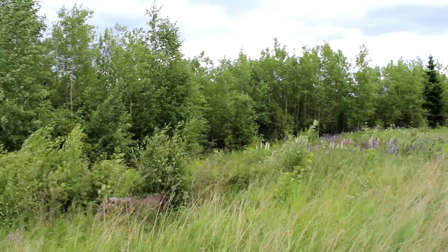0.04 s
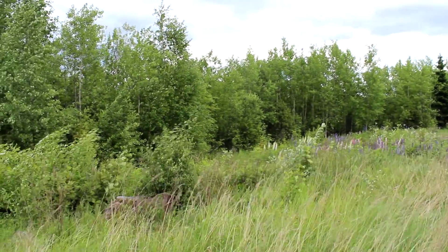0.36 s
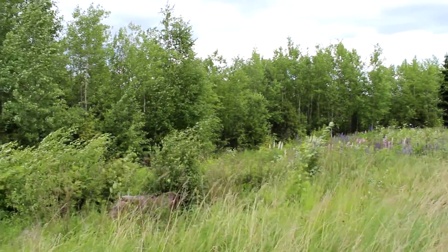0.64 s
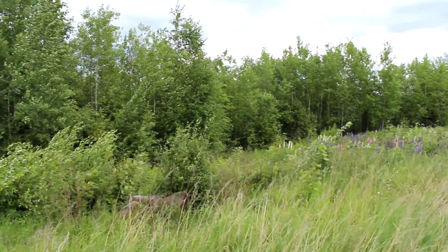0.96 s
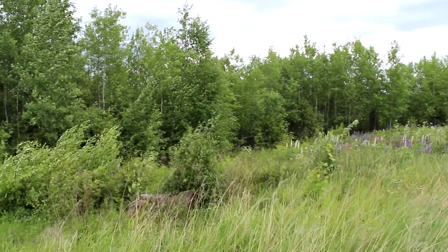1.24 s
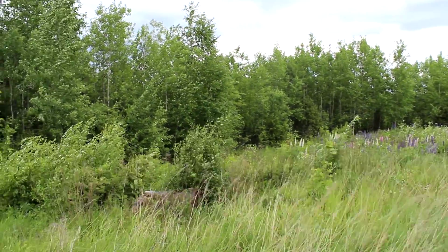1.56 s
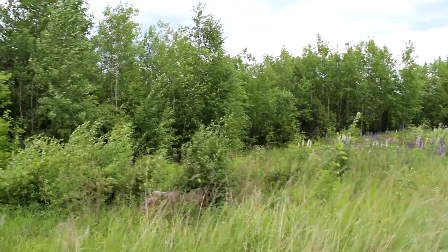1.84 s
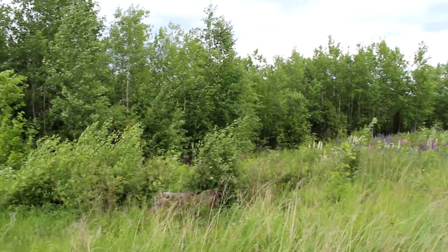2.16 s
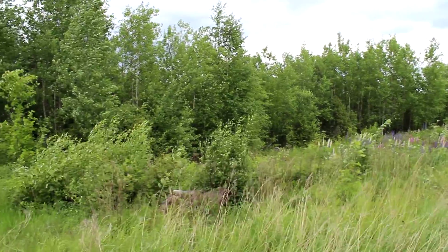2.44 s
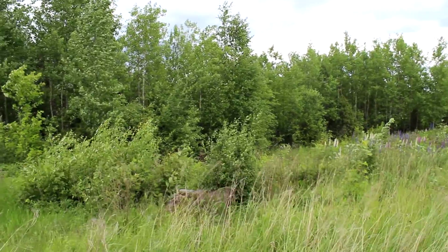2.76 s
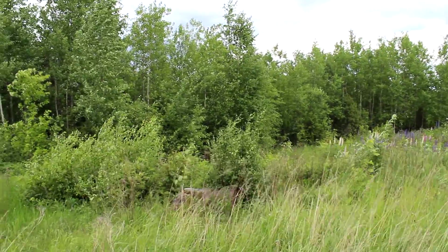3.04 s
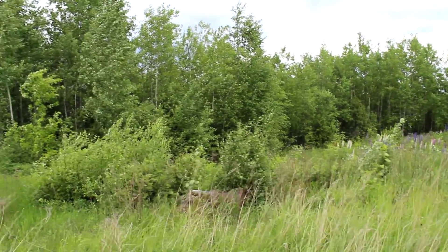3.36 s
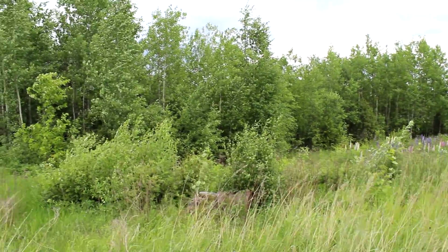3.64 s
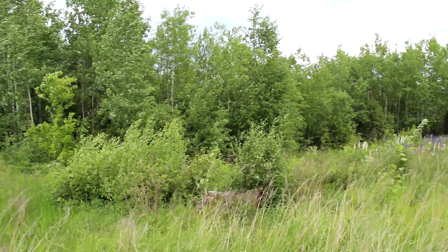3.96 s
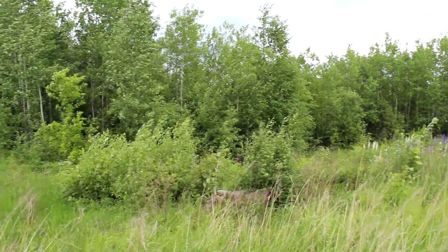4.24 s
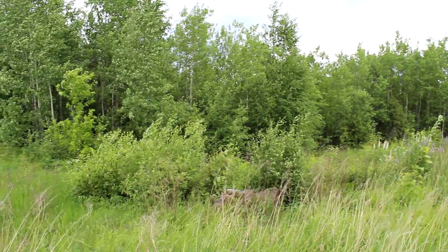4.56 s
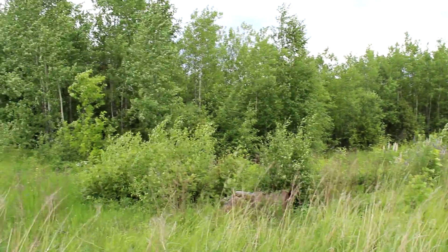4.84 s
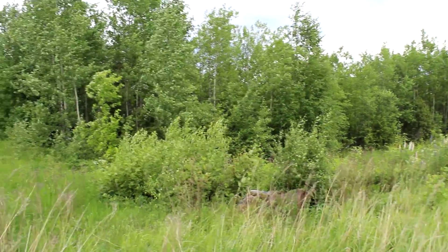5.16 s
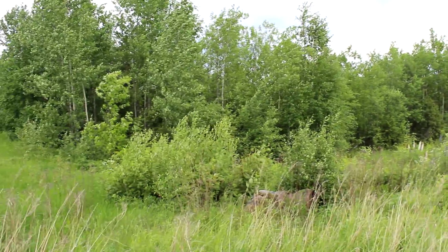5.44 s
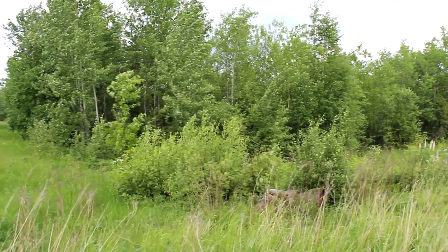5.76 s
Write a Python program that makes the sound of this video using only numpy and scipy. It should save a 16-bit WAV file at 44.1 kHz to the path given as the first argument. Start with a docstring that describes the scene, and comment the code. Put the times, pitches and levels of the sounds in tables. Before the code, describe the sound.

Wind flutters, sputters and knocks on a single small microphone outdoors, in tall grass beside a wood. Under the uneven rumble runs a broad rush of treetops and a fine hiss of nearby leaves. The foliage comes forward during a short lull, sinks back as more buffets arrive, then builds to its loudest and slightly higher in pitch at the close.

```python
"""An open meadow at the edge of a wood, in gusty wind, heard through one small microphone.
The tree crowns roar, near leaves and grass hiss, and a few dry stalks tick.
Eddies sweep over the microphone port as a fluttering rumble with hard buffets.
Each strong buffet makes a limiter duck, so the trees drop away and swell back in the lulls."""
import sys
import numpy as np
from scipy import signal
from scipy.fft import rfft, irfft, next_fast_len
from scipy.io import wavfile
from scipy.ndimage import uniform_filter1d, map_coordinates

SR = 44100
rng = np.random.default_rng(int(sys.argv[2]) if len(sys.argv) > 2 else 0)


def dump_mix(stems):
    """Bounce the given channels to the path in sys.argv[1] as a 16-bit WAV at rate SR."""
    frames = np.atleast_2d(stems).T  # one column per channel
    limited = np.clip(frames, -1, 1)  # hard clip at full scale
    pcm = np.round(limited * 32767).astype(np.int16)
    wavfile.write(sys.argv[1], SR, pcm)


N = 260631
TIME = np.arange(N) / SR

# Wind in the trees. Each row: time in seconds, crown level in dB, leaf level in dB, roar pitch factor.
TREE_WIND = [(0.0, -24.5, -34.5, 0.9), (0.8, -23.5, -35.5, 1.02), (1.6, -20.5, -32, 1.03),
             (2.05, -21, -32, 0.99), (2.3, -18, -30, 1.007), (2.75, -19, -34, 1.003), (3.4, -22, -33, 1.04),
             (3.95, -23.5, -40.5, 0.99), (4.4, -25.5, -38, 1.28), (4.85, -21.5, -33, 1.145),
             (5.3, -17, -28.5, 1.095), (5.91, -13.5, -31.5, 1.315)]
# Roar of the crowns at pitch factor 1. Each row: frequency in Hz, relative density in dB.
ROAR_SPECTRUM = [(100, -17.5), (300, -13), (500, -6.5), (700, -4.5), (950, 1), (1200, 0.5), (1550, -4),
                 (2000, -13), (2600, -23.5), (3400, -29), (6000, -42), (16000, -70)]
# Hiss of the leaves. Each row: frequency in Hz, relative density in dB.
HISS_SPECTRUM = [(500, -3), (2000, 7.5), (3200, 0.5), (4200, -1), (5200, -2), (6500, -4.5), (8000, -9),
                 (10000, -14.5), (12500, -18.5), (15700, -20)]
# Crispness of the leaves. Each row: time in seconds, added treble slope in dB per octave.
LEAF_CRISPNESS = [(0, 2.5), (.8, 3), (1.7, -1.5), (2.4, -3), (3.0, -2), (5.91, -0.5)]
# Ticks of dry stalks. Each row: middle in seconds, length in seconds, level in dB, pitch in Hz.
STALK_TICKS = [(1.27, .008, -50, 12500), (1.705, .05, -56, 14200), (2.246, .005, -48, 12800)]
# Slow pressure swings on the microphone. Each row: time in seconds, level in dB.
RUMBLE_LEVEL = [(0, -14), (.95, -24), (1.3, -34), (1.9, -28), (2.25, -34), (2.5, -24), (3.2, -26),
                (4.05, -26), (4.35, -35), (5.15, -26), (5.91, -30)]
# Spectrum of those swings. Each row: frequency in Hz, relative density in dB.
RUMBLE_SPECTRUM = [(5, -5), (20, -3), (45, 4), (70, 11.5), (120, -22), (400, -43), (2000, -100)]
# Sputter of small vortices. Each row: time in seconds, level in dB relative to the airflow.
SPUTTER_LEVEL = [(0, -12), (.8, -14), (1.3, -6), (2.2, -8.5), (3.0, -10), (3.3, -13.5), (3.75, -7.5),
                 (4.15, -6.5), (4.3, -20.5), (5.4, -17.5), (5.91, -30)]
# Tight vortices that crack in the port. Each row: time in seconds, peak in dB, pitch in Hz.
VORTEX_SNAPS = [(.321, 3.5, 620), (.4947, 8, 997.7), (.4965, -8, 2600), (.681, 7.5, 694), (2.997, 4, 939.9),
                (2.998, -8, 2104), (3.673, -3, 1349), (3.731, -2.5, 1300), (3.987, -3, 1191),
                (4.079, -8, 1602)]
# Steady airflow over the port. Each row: time in seconds, relative level in dB, eddy rate in Hz.
STEADY_FLOW = [(0.0, -21.0, 300.7), (0.37, -8.5, 251.7), (0.58, -31.5, 271.4), (0.95, -15, 241.9),
               (1.29, -11.5, 320.8), (1.76, -24.0, 258.6), (2.0, -12.0, 263.9), (2.12, -22, 269.8),
               (2.6, -17, 279.3), (2.91, -6.5, 289.1), (3.43, -9.5, 239), (4.13, -5.5, 291.6),
               (4.26, -20.5, 278.3), (4.74, -10.0, 302.2), (5.03, -13.5, 190.7), (5.33, -23.5, 270.3),
               (5.66, -17.5, 241.4), (5.91, -16.5, 192.3)]
# Single buffets. Each row: middle in seconds, length in seconds, level in dB, eddy rate in Hz.
PORT_BUFFETS = [(0.016, 0.035, -4.5, 319.8), (0.098, 0.036, -7, 399.8), (0.131, 0.0076, 4, 270),
                (0.349, 0.012, 0, 217.6), (0.374, 0.0081, -4, 299), (0.494, 0.02, 2.0, 332),
                (0.547, 0.011, -5.5, 319), (0.681, 0.008, 1.5, 297.3), (0.736, 0.099, -5.5, 249.2),
                (0.921, 0.012, 0, 204.9), (0.95, 0.016, 3, 248.5), (1.043, 0.012, 1.0, 240.4),
                (1.1, 0.082, -2.0, 311.5), (1.136, 0.00982, -1, 397.7), (1.358, 0.0083, -2.5, 317),
                (1.443, 0.0095, -6.0, 393.6), (1.62, 0.057, -14.5, 298.2), (1.905, 0.038, -9.5, 225),
                (1.988, 0.04, -8.5, 218), (2.517, 0.047, 1, 299.3), (2.681, 0.023, -1.5, 250.1),
                (2.873, 0.019, 1, 339.8), (3.003, 0.024, -2, 288.7), (3.04, 0.018, -2.5, 262),
                (3.089, 0.015, -6.0, 233.4), (3.146, 0.012, 1.5, 237), (3.282, 0.041, -5.0, 199.7),
                (3.378, 0.033, -3.0, 291.4), (3.483, 0.015, -4, 199.2), (3.564, 0.0163, -5.5, 225.1),
                (3.611, 0.016, -4.5, 259.9), (3.668, 0.012, -7, 351.2), (3.743, 0.022, -2.5, 263),
                (3.934, 0.026, -4, 384.2), (4.08, 0.008, 1, 411), (4.181, 0.037, -8.0, 272.8),
                (4.436, 0.014, -3.5, 269.2), (4.619, 0.013, -9, 380.1), (4.697, 0.011, -6, 309),
                (4.786, 0.035, -12.5, 301.5), (4.86, 0.0085, 0, 238.5), (5.154, 0.16, -11.5, 185),
                (5.208, 0.037, -3.5, 190), (5.246, 0.022, -4, 330.4), (5.468, 0.049, 2.0, 278.5),
                (5.548, 0.063, -3.5, 319.6), (5.745, 0.023, -10, 138.8)]
# Pressure of eddies passing at EDDY_HZ. Each row: frequency in Hz, relative density in dB.
EDDY_SPECTRUM = [(15, -27), (40, -63), (75, -3.5), (130, -0.5), (210, 1), (320, -2.5), (460, -9.5),
                 (650, -19), (1000, -30), (1600, -34.5), (3000, -65.5), (6000, -84)]
EDDY_HZ = 280.6


def gain_of(db):
    """Amplitude grows tenfold with every 20 dB."""
    return 10 ** (np.asarray(db) / 20)


def unit_rms(x):
    """Normalisation to a mean power of 1."""
    return x / np.sqrt(np.mean(x ** 2) + 1e-20)


def spectrum_db(spectrum, hz):
    """Interpolation of a spectrum on a logarithmic frequency axis."""
    knots_hz, db = np.transpose(spectrum)
    return np.interp(np.log(hz + 1), np.log(knots_hz + 1), db)


def follow(rows, t):
    """Linear interpolation of every column of a curve at the times t."""
    times, *columns = np.transpose(rows)
    return [np.interp(t, times, column) for column in columns]


def noise(spectrum, size):
    """Spectral shaping: white noise takes on the given spectrum."""
    padded = next_fast_len(size, real=True)
    gain = gain_of(spectrum_db(spectrum, np.fft.rfftfreq(padded, 1 / SR)))
    return unit_rms(irfft(rfft(rng.standard_normal(padded)) * gain, padded)[:size])


def wander(rate_hz):
    """Band-limited noise: a random fluctuation from about 2 Hz up to rate_hz."""
    padded = next_fast_len(N, real=True)
    hz = np.fft.rfftfreq(padded, 1 / SR)
    gain = hz / (hz + 2) / (1 + (hz / rate_hz) ** 4)
    return unit_rms(irfft(rfft(rng.standard_normal(padded)) * gain, padded)[:N])


def grid(size=512):
    """The time-frequency plane: frame times as a column, frequencies as a row."""
    return np.arange(0, N + size, size // 4)[:, None] / SR, np.fft.rfftfreq(size, 1 / SR)


def rustle(field_db, patchy_db, size=512):
    """Short-time shaping: noise of even power, coloured in patches as single boughs catch the wind."""
    real, imag, patches = rng.standard_normal((3, *field_db.shape))
    patches = unit_rms(uniform_filter1d(uniform_filter1d(patches, 18, axis=0), 7, axis=1))
    gain = gain_of(field_db + patchy_db * patches)
    spectra = (real + 1j * imag) * gain / np.linalg.norm(gain, axis=1, keepdims=True)
    return unit_rms(signal.istft(spectra.T, nperseg=size, noverlap=size - size // 4)[1][:N])


def crowns():
    """Aeolian sound: the broad, distant roar rises in pitch with the wind speed."""
    t, hz = grid()
    level_db, speed = follow(TREE_WIND, TIME)[0], follow(TREE_WIND, t)[2]
    sway_db = 0.45 * wander(rate_hz=25)
    return gain_of(level_db + sway_db) * rustle(spectrum_db(ROAR_SPECTRUM, hz / speed), patchy_db=1.85)


def leaves():
    """Incoherent addition: countless leaf contacts merge into a hiss with a fine grain."""
    t, hz = grid()
    level_db = follow(TREE_WIND, TIME)[1]
    treble_db = follow(LEAF_CRISPNESS, t)[0] * np.log2(1 + hz / 5000)
    hiss = rustle(spectrum_db(HISS_SPECTRUM, hz) + treble_db, patchy_db=0.25)
    flicker_db = 0.75 * wander(rate_hz=20)
    grain = gain_of(0.39 * wander(rate_hz=1200))
    return gain_of(level_db + flicker_db) * unit_rms(hiss * grain)


def bump(middle, length):
    """A super-Gaussian envelope: height 1, steep flanks, an area of about its length."""
    out, near = np.zeros(N), abs(TIME - middle) < 2 * length
    out[near] = np.exp(-abs(np.sqrt(np.pi) * (TIME[near] - middle) / length) ** 3)
    return out


def stalks():
    """Friction: dry stalks brush each other with a thin, high tick of narrow-band noise."""
    out = np.zeros(N)
    for middle, length, db, hz in STALK_TICKS:
        scrape = wander(rate_hz=1100) * np.cos(2 * np.pi * hz * TIME)
        out += gain_of(db) * bump(middle, length) * unit_rms(scrape)
    return out


def rumble():
    """Turbulent pressure: the largest eddies press slowly on the microphone."""
    level_db, = follow(RUMBLE_LEVEL, TIME)
    return gain_of(level_db) * noise(RUMBLE_SPECTRUM, size=N)


def vortex(t, hz):
    """Convection: a vortex core crosses the port as a pressure swing of one or two cycles."""
    phase = 2 * np.pi * hz * t
    return np.cos(phase) / np.cosh(np.clip(phase / 1.3, -30, 30))


def sputter(per_s, low_hz, high_hz, sizes=16):
    """A Poisson process: small vortices break off at random; the smaller, the higher and weaker."""
    t, out = np.arange(-400, 400) / SR, np.zeros(N)
    for hz in np.geomspace(low_hz, high_hz, sizes):
        kicks = rng.uniform(-1.23, 1, N) * (rng.random(N) < per_s / sizes / SR)
        out += low_hz / hz * signal.oaconvolve(kicks, vortex(t, hz), "same")
    return unit_rms(out)


def vortex_pops(core_boost_db=2.5, core_pitch_ratio=1.09):
    """Pressure transients: a vortex knocks at the heart of each buffet, and tighter ones crack."""
    cores = [(middle, db + core_boost_db, hz * core_pitch_ratio) for middle, _, db, hz in PORT_BUFFETS]
    out = np.zeros(N)
    for middle, db, hz in cores + list(VORTEX_SNAPS):
        near = abs(TIME - middle) < 2 / hz
        out[near] += gain_of(db) * vortex(TIME[near] - middle, hz)
    return out


def airflow(trim_db=-1, flutter_db=3):
    """Addition of powers: each buffet strengthens the flow and pulls the eddy rate toward its own."""
    flow_db, flow_hz = follow(STEADY_FLOW, TIME)
    power = gain_of(flow_db + trim_db + flutter_db * np.tanh(wander(rate_hz=39.6))) ** 2
    weighted_rate = power * flow_hz
    for middle, length, db, hz in PORT_BUFFETS:
        buffet_power = gain_of(db) ** 2 * bump(middle, length)
        power += buffet_power
        weighted_rate += buffet_power * hz
    return np.sqrt(power), weighted_rate / power


def buffeting(strength, rate_hz, fits_db=4):
    """Frozen turbulence: the faster a fixed pattern of eddies passes the port, the higher it sounds."""
    position = np.cumsum(rate_hz / EDDY_HZ)
    eddies = map_coordinates(noise(EDDY_SPECTRUM, size=2 * N), [position], order=3, mode="wrap")
    # level out the pattern's own swells, so that the airflow sets the strength
    eddies /= np.sqrt(uniform_filter1d(uniform_filter1d(eddies ** 2, size=700), size=500) + 1e-6)
    # the flow clings and tears loose in fits of a few milliseconds
    fits = unit_rms(gain_of(fits_db * np.tanh(wander(rate_hz=110))))
    sputter_db, = follow(SPUTTER_LEVEL, TIME)
    small_vortices = gain_of(sputter_db) * sputter(per_s=320, low_hz=428, high_hz=1400)
    return fits * strength * (eddies + small_vortices)


def scene():
    """Superposition: the sound of the vegetation and the wind on the microphone add in one channel."""
    vegetation = crowns() + leaves() + stalks()
    return (vegetation + buffeting(*airflow()) + vortex_pops() + rumble())[None]


def limiter(x, threshold_db=-12, attack_s=0.028, release_s=0.29, initial_duck_db=13):
    """Automatic gain control: the gain falls just after a loud buffet and recovers in the lull."""
    level_db = 10 * np.log10(abs(uniform_filter1d(x[0] ** 2, size=440)) + 1e-12)
    excess_db = np.maximum(level_db - threshold_db, 0)
    # each peak of the excess decays exponentially until a higher one takes over
    release = np.exp(-TIME / release_s)
    target_db = release * np.maximum.accumulate(np.maximum(excess_db / release, initial_duck_db))
    lag = np.exp(-1 / (attack_s * SR))
    duck_db = initial_duck_db + signal.lfilter([1 - lag], [1, -lag], target_db - initial_duck_db)
    return x / gain_of(duck_db)


def record(dry):
    """Saturation and band limiting: peaks that pass the limiter are rounded, then the top is cut off."""
    ducked = limiter(dry)
    clipped = ducked / (1 + ducked ** 8) ** (1 / 8)
    lowpass = signal.firwin(1023, cutoff=15720, window=("kaiser", 9), fs=SR)
    return signal.oaconvolve(clipped, lowpass[None], "same")


dry = scene()
out = record(dry)
dump_mix(out)
```